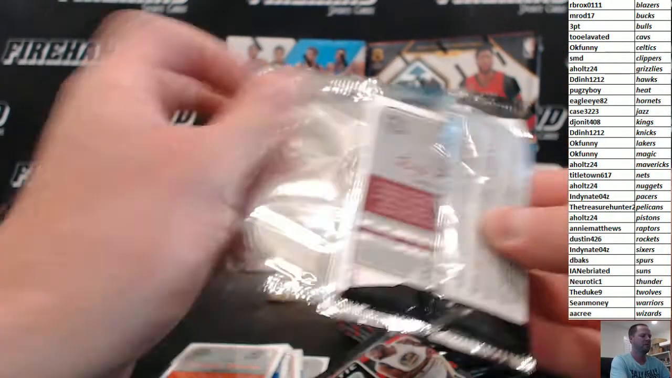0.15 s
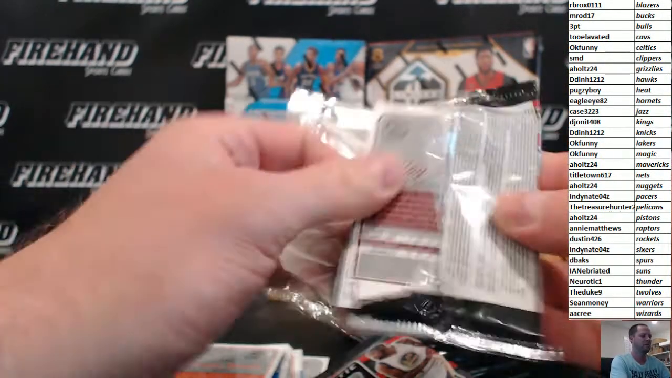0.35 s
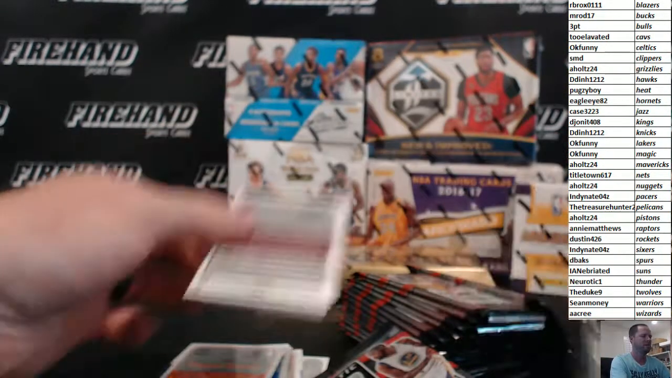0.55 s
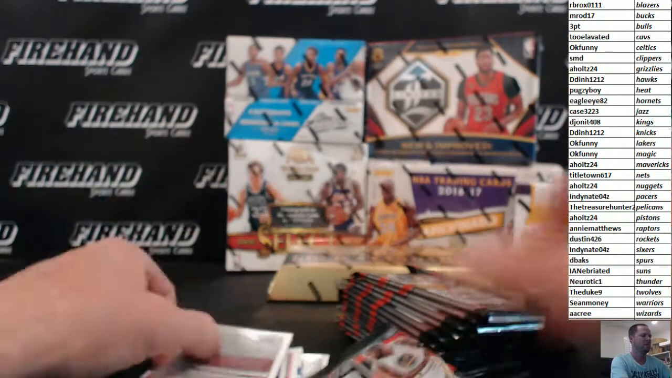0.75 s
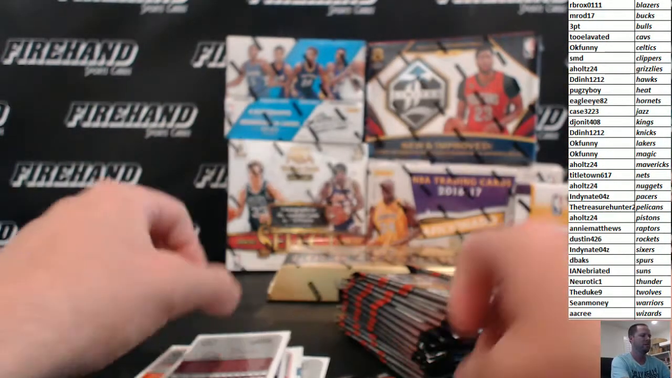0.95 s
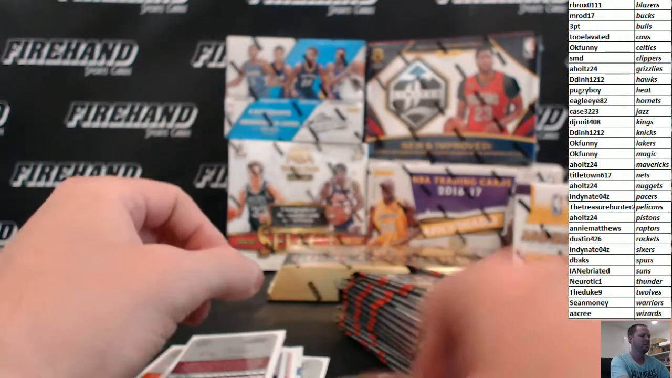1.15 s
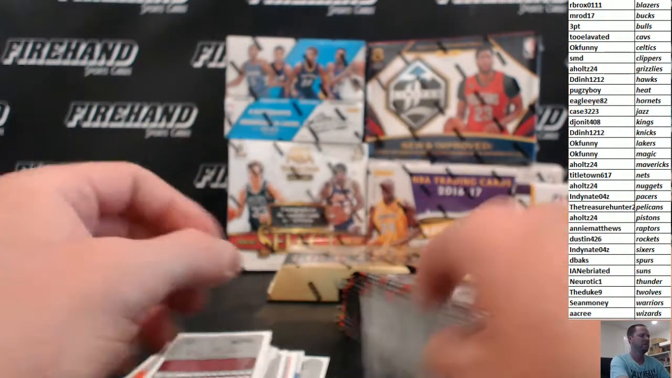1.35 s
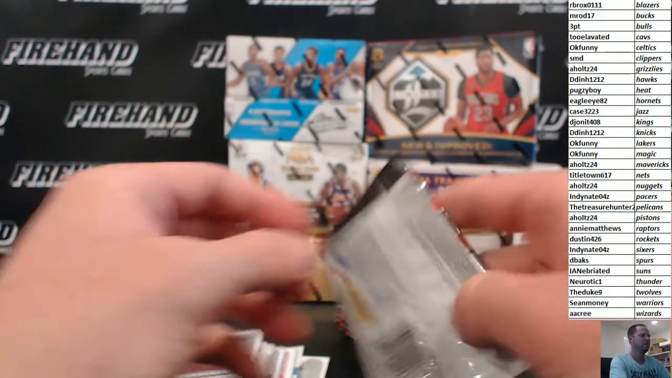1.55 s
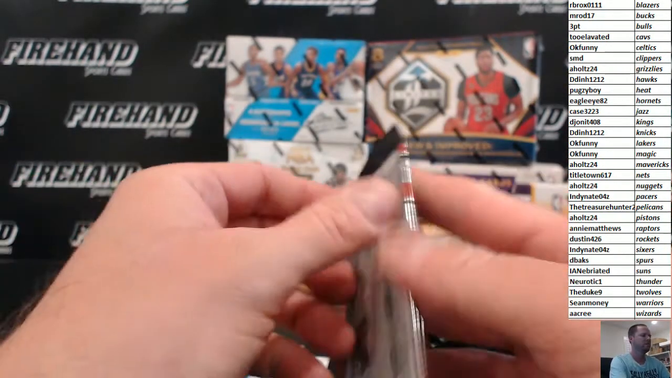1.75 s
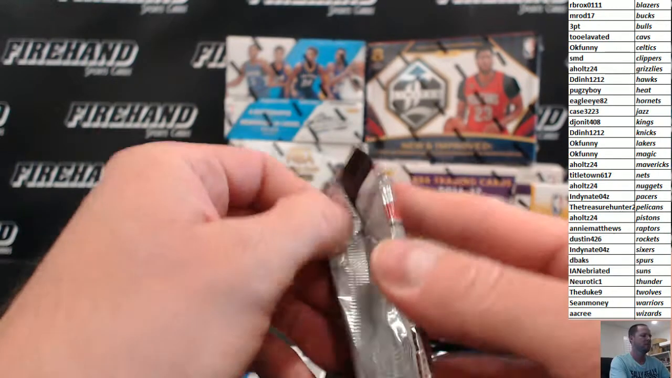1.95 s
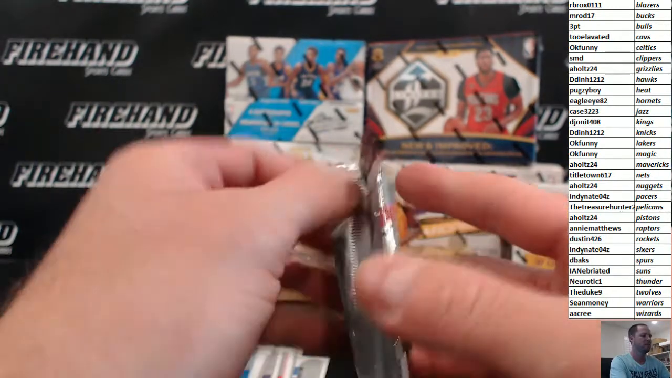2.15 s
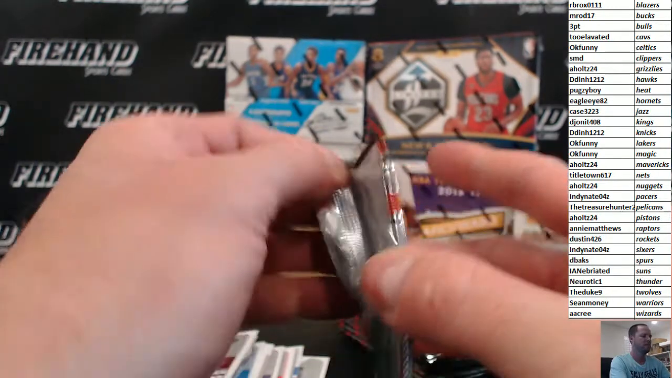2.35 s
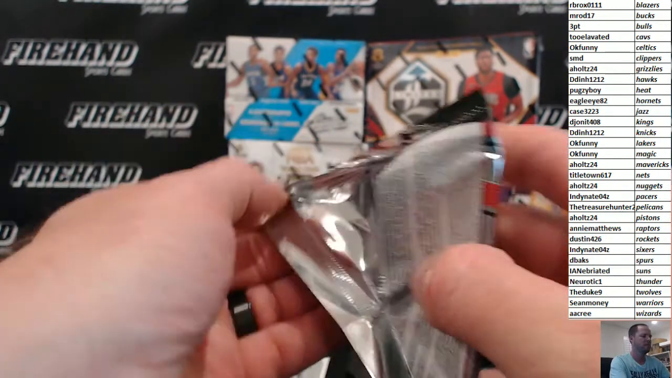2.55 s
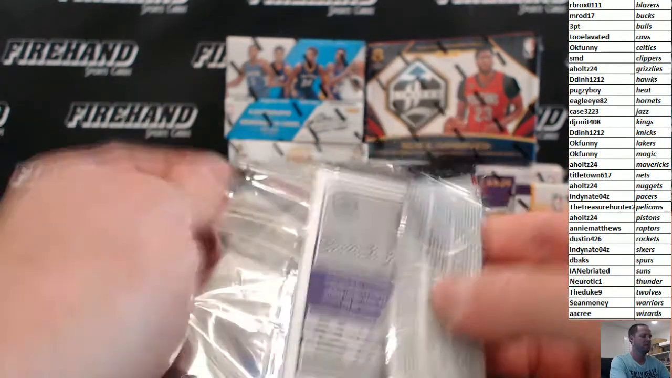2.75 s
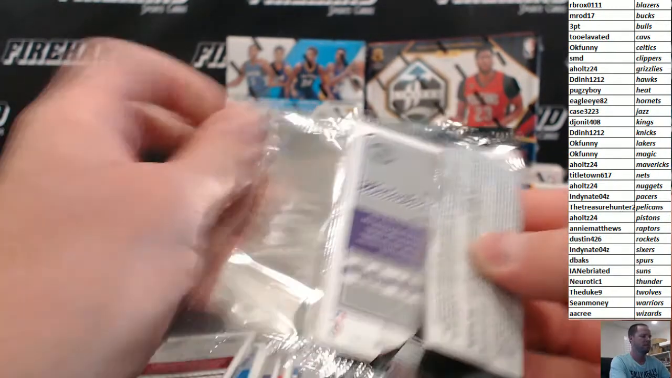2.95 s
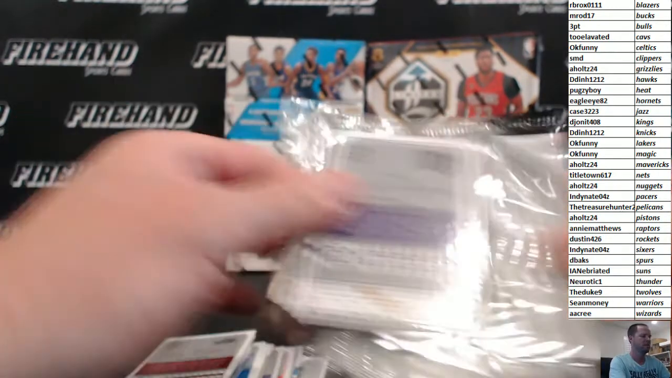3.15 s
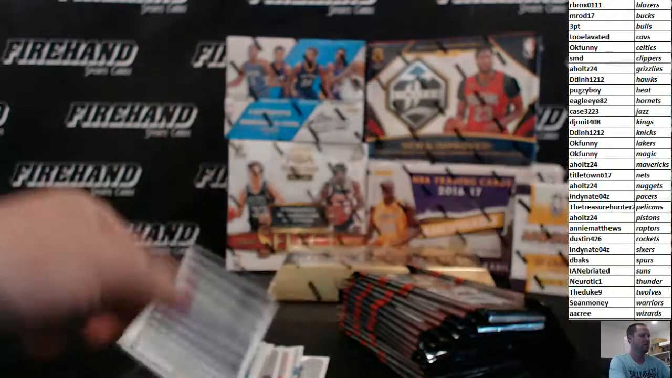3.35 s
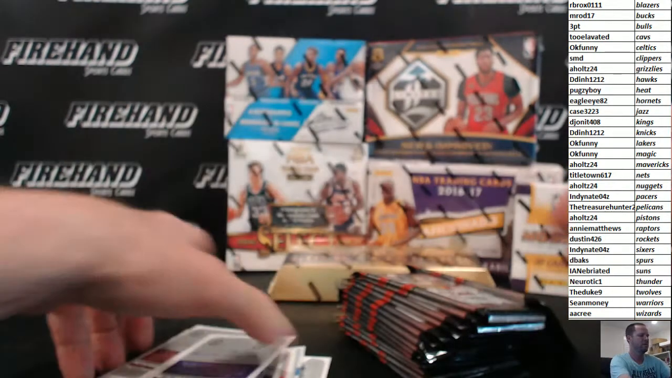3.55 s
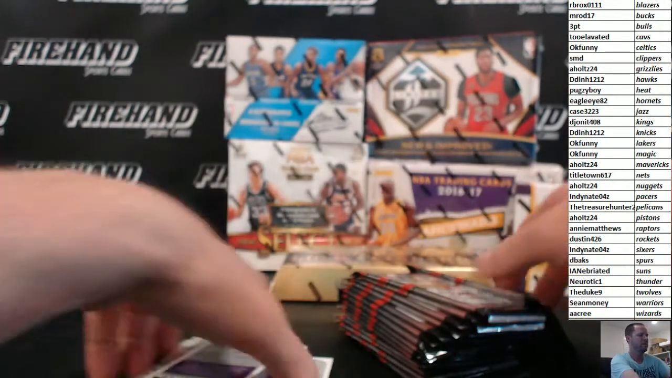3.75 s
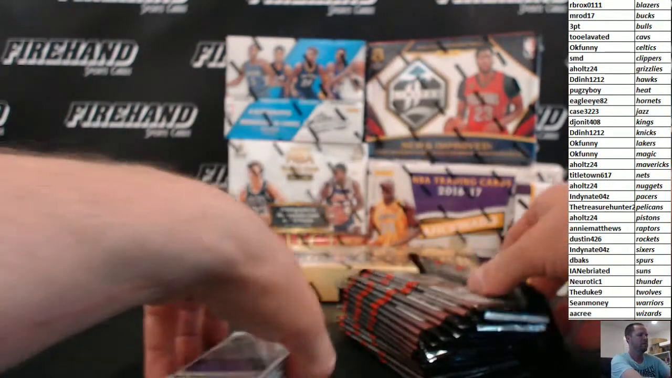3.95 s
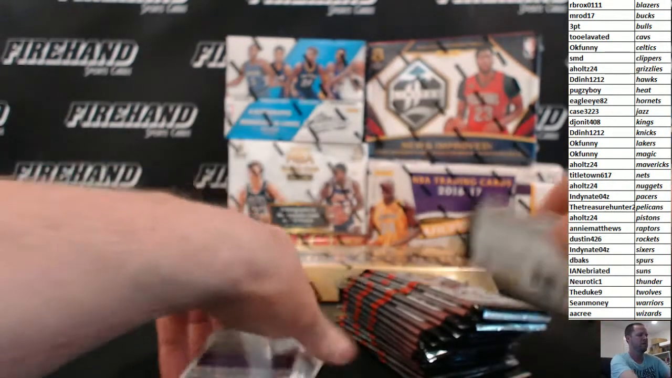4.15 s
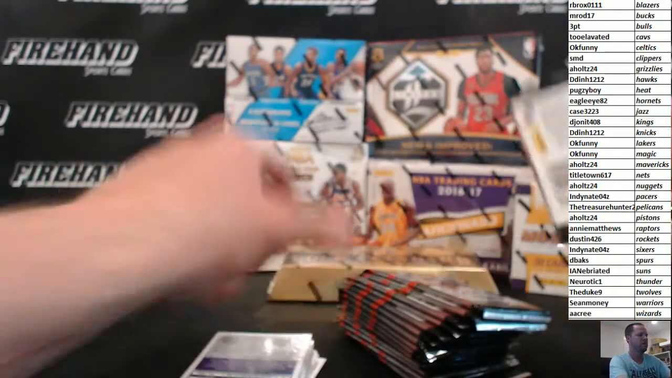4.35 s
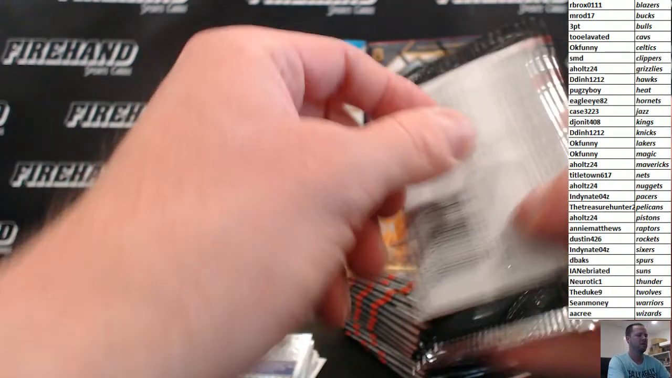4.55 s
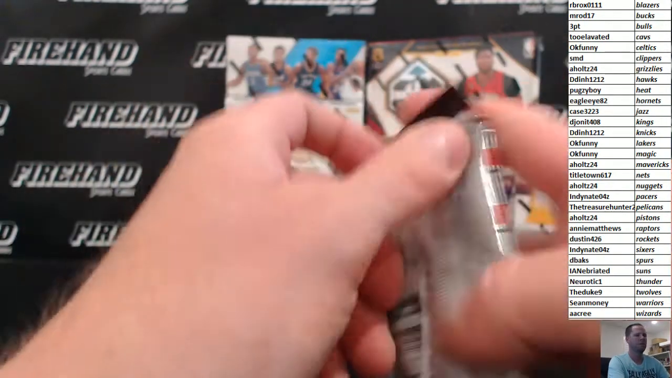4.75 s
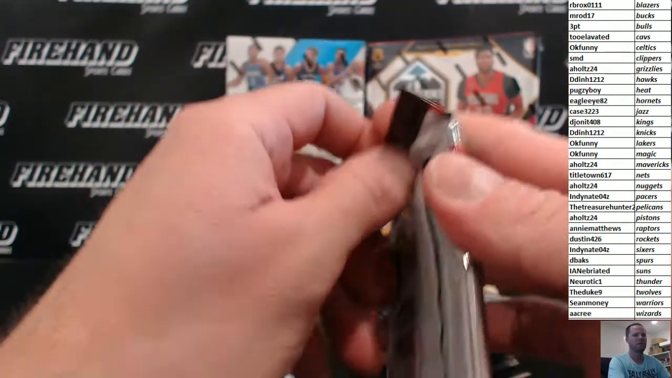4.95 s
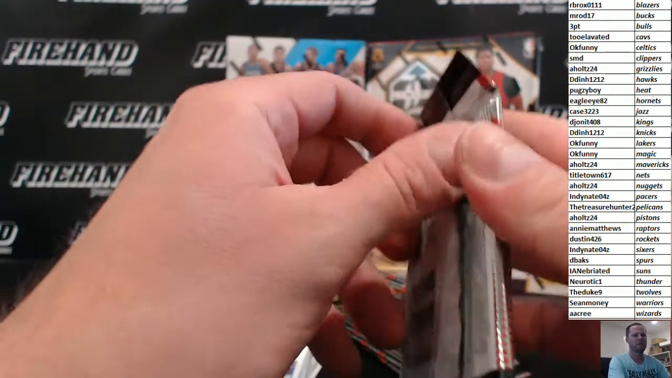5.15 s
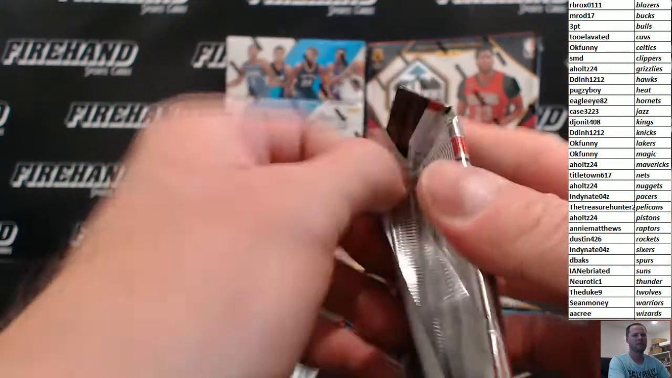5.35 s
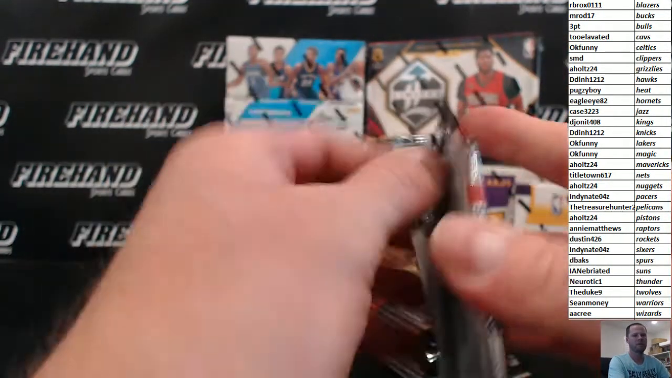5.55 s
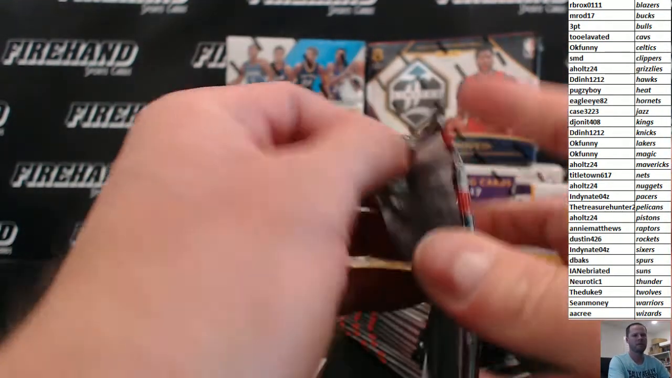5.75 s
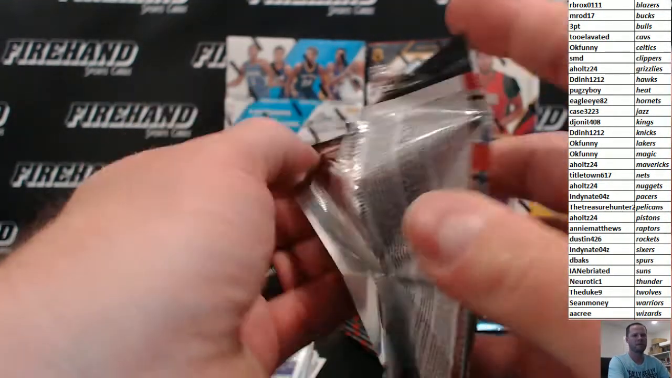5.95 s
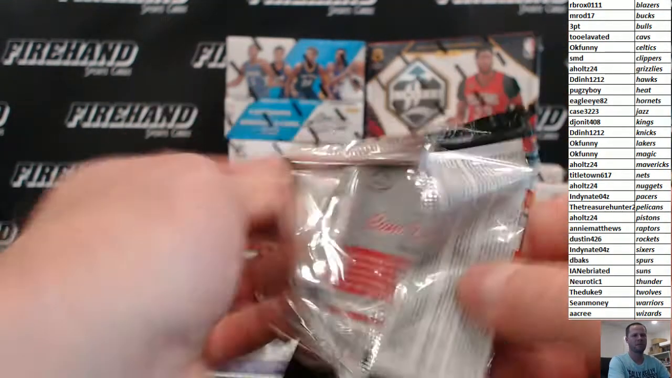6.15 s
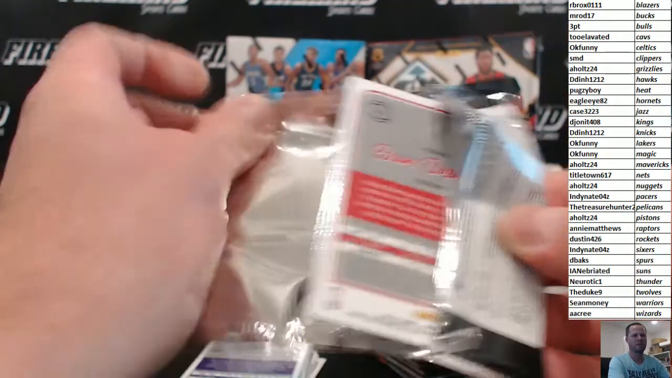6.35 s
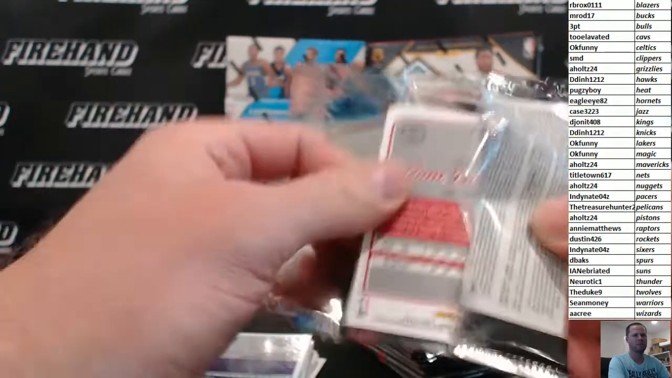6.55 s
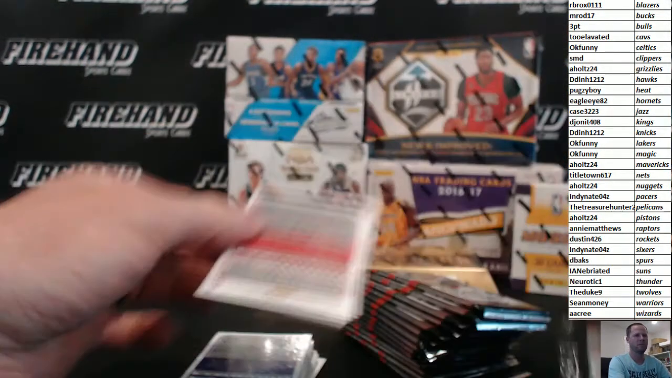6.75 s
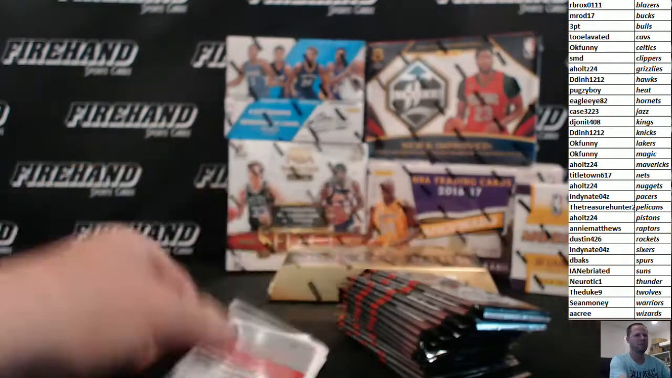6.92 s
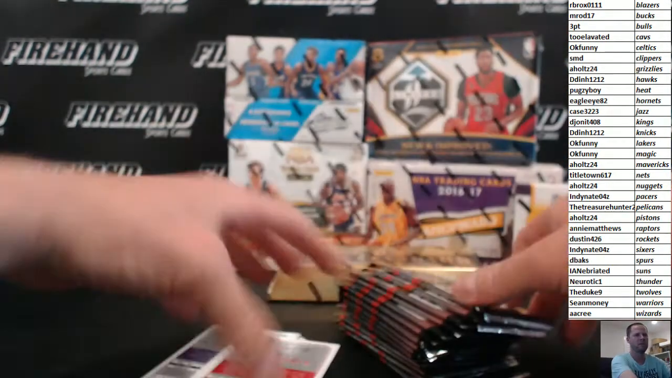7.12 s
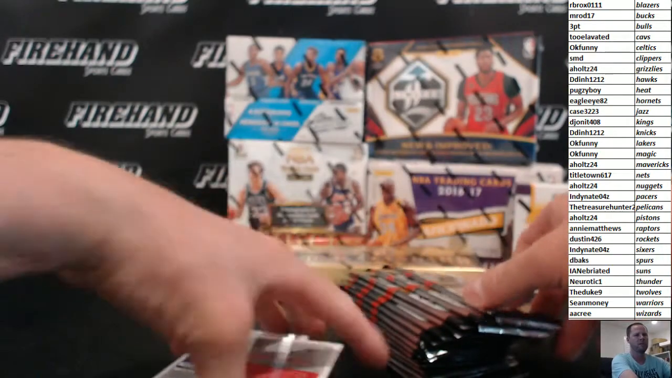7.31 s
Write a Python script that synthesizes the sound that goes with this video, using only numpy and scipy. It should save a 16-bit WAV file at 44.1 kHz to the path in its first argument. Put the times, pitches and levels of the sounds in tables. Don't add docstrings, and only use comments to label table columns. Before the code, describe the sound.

Close to a stereo pair of microphones in a small room, hands tear open crisp foil packets. A loud rip comes first, then soft card taps on the table and a near-quiet gap. A second packet crackles and rips hard, cards land again, and after faint fidgeting a third crackles thickly and tears. Low hum and room air continue underneath, with the top treble missing.

```python
import sys
import numpy as np
from scipy import signal
from scipy.fft import rfft, irfft, next_fast_len
from scipy.io import wavfile
from scipy.ndimage import uniform_filter1d

SR = 44100
rng = np.random.default_rng(int(sys.argv[2]) if len(sys.argv) > 2 else 0)


def elevation(decibels):
    levels = np.asarray(decibels, float)
    return 10 ** (levels / 20)


def file_out(sig):
    cols = np.atleast_2d(sig).T
    lim = np.clip(cols, -1, 1)
    pcm = np.round(lim * 32767).astype(np.int16)
    wavfile.write(sys.argv[1], SR, pcm)


N = 329868


def rms_one(x):
    return x / np.sqrt(np.mean(x ** 2) + 1e-20)


def at_hz(points, hz):
    point_hz, value = np.transpose(points)
    return np.interp(np.log(hz + 1), np.log(point_hz + 1), value)


def drift(rate):
    r = np.exp(-80 * np.pi * rate / SR)
    slow = signal.lfilter([1], [1, -2 * r, r * r], rng.standard_normal(N // 40 + 2002))
    slow = rms_one(slow[2000:])
    return np.interp(np.arange(N) / 40, np.arange(len(slow)), slow)


def ring(clicks, hz, t60):
    r, w = elevation(-60 / (t60 * SR)), 2 * np.pi * hz / SR
    return signal.lfilter([0, np.sin(w)], [1, -2 * r * np.cos(w), r * r], clicks + 1e-18)


def dying(power, t60):
    r = elevation(-120 / (t60 * SR))
    return np.sqrt(np.abs(signal.lfilter([1 - r], [1, -r], power + 1e-30)))


def band(x, low_hz, high_hz):
    return signal.sosfilt(signal.butter(3, [low_hz, high_hz], "band", fs=SR, output="sos"), x)


def pair(spectrum, likeness):
    hz = np.fft.rfftfreq(N, 1 / SR)
    mid, side = rfft(rng.standard_normal((2, N)))
    alike = np.clip(at_hz(likeness, hz), 0, .999)
    sides = np.sqrt(1 + alike) * mid + np.sqrt(1 - alike) * side * [[1], [-1]]
    return rms_one(irfft(sides * elevation(at_hz(spectrum, hz)), N))


def lean(x, points):
    size = next_fast_len(N)
    left_minus_right_db = at_hz(points, np.fft.rfftfreq(size, 1 / SR))
    return irfft(rfft(x, size) * elevation(left_minus_right_db / 2 * [[1], [-1]]), size)[:, :N]


def room(x, echoes, t60, wet_db):
    t = np.arange(echoes.shape[-1]) / SR
    size = next_fast_len(N + len(t))
    tails = echoes * elevation(-60 * t / t60) * np.minimum(t / 0.0016, 1)
    tails = elevation(wet_db) * tails / np.sqrt(np.sum(tails ** 2) / tails[..., 0].size)
    place = (np.arange(N) // int(.07 * SR)) % len(tails)
    wet = sum(rfft(x * (place == k), size) * rfft(tail, size) for k, tail in enumerate(tails))
    return x + irfft(wet, size)[:, :N]


# pitch in Hz, level in dB.
AIR_COLOUR = [(40, -13), (76, -24), (95, -5), (124, -3.5), (170, -7), (555, -10.5), (643, -8.5), (727, -13),
              (1720, -15), (2680, -25), (6820, -30), (7800, -35), (8940, -64)]
# pitch in Hz, likeness from 0 to 1.
AIR_ALIKE = [(60, 0.75), (300, 1), (1500, 0.2), (6000, 0.46)]
# pitch in Hz, left minus right in dB.
AIR_BALANCE = [(60, 15), (210, 4.8), (710, 5.3), (2460, 1.5), (8490, 0.5)]
# pitch in Hz, level in dB rms.
MAINS = [(120, -69), (240, -82.5)]


def background():
    t = np.arange(N) / SR
    hum = sum(elevation(db + 2.0) * np.sin(2 * np.pi * hz * t) for hz, db in MAINS)
    hum = hum * elevation(1.0 * drift(2.9))
    air = elevation(-69.5 + 1.5 * drift(14.0)) * pair(AIR_COLOUR, AIR_ALIKE)
    return lean(air + hum, AIR_BALANCE)


# start in seconds, peak in dB, contact time in seconds.
LANDINGS = [(0.823, -27, 0.0015), (0.842, -32, 0.0009), (0.865, -39.5, 0.003), (0.877, -44.5, 0.0017),
            (1.442, -39, 0.00061), (2.506, -32.5, 0.0014), (2.785, -30, 0.0007), (3.24, -36, 0.0018),
            (3.259, -43, 0.0014), (3.407, -42, 0.0017), (3.473, -27, 0.00082), (3.481, -32, 0.00053),
            (3.5, -34.5, 0.0018), (6.239, -21, 0.00094), (6.922, -33.5, 0.002), (6.94, -32, 0.0019),
            (6.972, -53, 0.0022), (7.024, -39, 0.0027)]
# pitch in Hz, level in dB, t60 in seconds.
TABLE_MODES = [(113, 1.5, 0.11), (129, 2, 0.08), (179, 0, 0.14), (275, 0, 0.043), (470, -1.5, 0.014),
               (597, -14, 0.054), (1010, -10, .04), (1400, -32.5, 0.035)]


def thuds(echoes):
    push = np.zeros(N)
    for s, db, contact in LANDINGS:
        shape = np.hanning(max(int(contact * SR), 3))
        i = round(s * SR)
        push[i:i + len(shape)] += elevation(db - 3.5) * shape / shape.sum()
    top = sum(elevation(db) * ring(push, hz, t60) * (-1) ** k for k, (hz, db, t60) in enumerate(TABLE_MODES))
    return room(top, echoes, t60=0.085, wet_db=-11.0)


# start in seconds, length in seconds,
# fine creases in dB, folds in dB relative to them, air pocket in dB relative to them.
FOIL_LET_GO = [(0.352, 0.15, -41.5, -10.5, -2.5), (1.728, 0.2, -58, -4.5, -3),
               (2.03, .13, -33.5, -5.5, -34), (3.245, 0.033, -50.5, 4, 3), (3.942, 0.094, -58.5, -25, -2),
               (4.072, 0.11, -46.5, -6.5, -12), (1.86, 0.06, -54.5, -31, -23), (4.52, 0.11, -56, -10.5, -4),
               (4.896, 0.2302, -48, -16.5, -20), (5.494, 0.092, -38.5, -11.5, -37.5),
               (6.567, 0.2, -57.5, -20.5, -20)]
SEAM_TEARS = [
    (0.054, 0.16, -22, 0, -1.5),
    (2.5005, 0.18, -17.5, 0, -7.5),
    (2.777, .18, -21.5, -2, -2),
    (5.95, 0.15, -29, -3.5, -9.5),
    (6.241, 0.15, -23, 3, -2.35),
]
FOIL_PULLS = [
    (1.905, 0.04, -45.5, -8.5, -20),
    (2.262, 0.065, -35.5, 2.5, -4.5),
    (2.735, 0.037, -23.5, 2, -5),
    (3.88, 0.06, -65, -14, -5),
    (5.096, 0.058, -57, -19, -6),
    (6.13, 0.023, -25, 4.5, -3.5),
]
FOIL_RUBS = [(0.0, 0.021, -29, 0.5, -3), (0.026, 0.02, -20, -5, -3), (0.26, 0.24, -69.5, -3, 3),
             (3.29, 0.11, -73, 5.5, 5.5), (2.62, 0.07, -37.5, -1, -23), (2.693, 0.045, -28.5, 1.5, -11),
             (4.85, 0.03, -56.5, -25.5, -28.5), (0.52, 0.41, -69.5, 1, 1.5), (1.255, 0.17, -70, -2.5, -1),
             (1.378, 0.076, -50.5, 4.5, -2), (1.968, 0.057, -47.5, -4, -24), (1.998, 0.02, -33, 0.5, -1.4),
             (2.349, 0.11, -33.5, -1.5, -8), (3.0, 0.15, -70, -0.5, 2), (3.175, 0.061, -46.5, -17, -1.5),
             (4.645, 0.17, -58.5, -4, -6), (4.882, 0.025, -47.5, -14.5, -28),
             (5.18, .16, -47.5, -11.5, -35), (5.376, 0.098, -39.5, -4, -17), (5.55, 0.4, -47.5, -9, -11.5),
             (5.71, 0.31, -36.5, 0.5, -17), (5.874, 0.068, -20, -1.5, -4.5),
             (6.169, 0.061, -25, -2.5, -3.5), (6.43, 0.18, -65, 0, 1), (6.747, 0.11, -66, -1, 0.5)]
CARD_BRUSHES = [
    (0.815, 0.093, -60.5, -4.5, 2),
    (3.4, 0.27, -67, 2.5, 6),
    (6.655, 0.1, -59.5, 5, 7.5),
    (6.91, .13, -69, 14, 6),
    (7.014, 0.1, -72, 8.5, 10.5),
]
PACK_SLIDE = [
    (1.52, 0.19, -47, -9.5, -16.5),
]
# gestures, share of length before the peak, rise in dB, fall in dB,
# release in dB per second, whole wrapper offset in dB.
GESTURE_KINDS = [
    (FOIL_LET_GO, 0.018, 5, 31.6, 100, -1), (SEAM_TEARS, 0.06, 0.61, 26.96, 780, 3.4),
    (FOIL_PULLS, 0.9, 13, .3, 210, -14), (FOIL_RUBS, 0.059, 6.7, 0.73, 340, -4.5),
    (CARD_BRUSHES, .35, 1.3, 47, 250, 0.53), (PACK_SLIDE, 0.2, 11, 5.1, 400, 38)]


def handling(lead_in_db=93, wrapper_follows=2.3, tight_hz=5380, folds_db_per_octave=41):
    t = np.arange(N) / SR
    power, pitch = np.zeros((4, N)) + elevation(-280), np.zeros(N)
    for rows, share, rise_db, fall_db, release, wrapper_db in GESTURE_KINDS:
        for s, length, db, folds_db, pocket_db in rows:
            span = slice(max(int((s - .03) * SR), 0), int((s + length + .25) * SR))
            peak_s = np.clip(share, .005, .995) * length
            knots = s + np.array([-.03, 0, peak_s, length, length + 1])
            shape_db = [-rise_db - lead_in_db, -rise_db, 0, -fall_db, -fall_db - release]
            level = db + np.interp(t[span], knots, shape_db)
            sizes = np.array([0, folds_db, pocket_db, wrapper_follows * pocket_db + wrapper_db])
            power[:, span] += elevation(2 * (level + sizes[:, None]))
            pitch[span] -= elevation(2 * level) * folds_db / folds_db_per_octave
    db = 10 * np.log10(power)
    return db[0], *(db[1:] - db[0]), tight_hz * 2 ** (pitch / power[0])


# lowest pitch in Hz, highest pitch in Hz.
CREASE_ZONES = [(2700, 8600), (1400, 2700), (650, 1400), (200, 650)]
RING_CYCLES = [4.6, 20, 11, 40]
# pitch in Hz, level in dB per Hz.
FOIL_COLOUR = [(200, -9.5), (280, -9), (430, -3), (650, -15.5), (780, -7.5), (980, 2), (1300, -2),
               (1450, -17), (1720, 2.5), (1950, -9), (2250, 0), (2700, -13.5)]
# pitch in Hz, level in dB.
FINE_COLOUR = [(2700, 0), (3300, -5), (4600, 2.5), (5600, -2), (7300, 1), (8200, -8.5)]


def creases(clicks, zone, tight_hz, hump_octaves=0.7, skirt_db=-17.5, patchy_db=2.0):
    at = np.flatnonzero(clicks)
    low, high = CREASE_ZONES[zone]
    pitches, dealt = np.geomspace(low, high, num=12), rng.integers(0, 12, N)
    colour = elevation(at_hz(FOIL_COLOUR, pitches))[:, None] * np.ones(len(at))
    if zone == 0:
        octaves_off = np.log2(pitches[:, None] / tight_hz[at])
        colour = np.exp(-(octaves_off / hump_octaves) ** 2) + elevation(skirt_db)
        colour = colour * elevation(at_hz(FINE_COLOUR, pitches))[:, None]
    patches = rng.standard_normal((12, N // 3000 + 1))
    colour = colour * elevation(patchy_db * patches[:, at // 3000])
    colour = colour / np.sqrt(np.mean(colour ** 2, axis=0))
    clicks = clicks.copy()
    clicks[at] *= colour[dealt[at], np.arange(len(at))]
    rings = 0
    for k, hz in enumerate(pitches):
        rings = rings + ring(clicks * (dealt == k), hz, RING_CYCLES[zone] / hz) * np.sqrt(hz / low)
    return band(rings, low * 0.95, high * 1.0)


# start in seconds, length in seconds,
# level in dB rms, pitch in Hz.
CAVITIES = [(0.035, 0.11, -26.5, 1140), (0.34, .14, -50.5, 2430), (6.683, 0.039, -52, 2900),
            (3.236, 0.046, -48, 1640), (3.421, 0.045, -50.5, 2060), (2.164, 0.074, -57, 1830),
            (6.691, 0.014, -44, 7200), (2.044, 0.095, -43, 4470), (0.81, 0.048, -48, 1040),
            (1.385, 0.11, -53, 590), (1.548, 0.19, -47, 2210), (1.61, 0.11, -42, 366),
            (1.851, 0.092, -54.5, 1810), (6.637, 0.089, -56, 7700), (2.397, 0.085, -36.5, 1760),
            (2.772, 0.071, -24, 280), (2.746, 0.085, -24.5, 840), (2.9, 0.045, -49.5, 1730),
            (2.502, 0.11, -27, 4500), (1.53, 0.23, -52.5, 5400), (4.52, 0.067, -62, 1120),
            (4.551, 0.044, -56.5, 284), (4.65, 0.091, -51.5, 1100), (4.785, 0.17, -60, 1890),
            (5.184, 0.17, -50, 1730), (5.367, 0.017, -48.5, 330), (5.559, 0.046, -49.5, 413),
            (5.5, 0.51, -50, 1740), (5.69, 0.65, -38, 1710), (5.882, 0.036, -21.5, 1691),
            (6.661, 0.12, -50, 252), (6.757, 0.029, -51, 710), (6.928, 0.072, -54, 1370),
            (7.02, 0.033, -52.5, 890), (4.767, 0.023, -54, 250)]


def hollows(per_s=3500, spread=1.04, q=10, peak_share=0.16, rise_db=13, fall_db=15):
    out = np.zeros(N)
    for s, length, db, hz in CAVITIES:
        u = np.arange(int(.3 * SR)) / SR / length
        draw = rng.random((2, len(u)))
        clicks = (draw[0] < per_s / SR) * (draw[1] - .5) + 1e-9
        t60 = q / hz * (hz / 1500) ** 0.27
        apart = spread ** np.sqrt(hz / 1500)
        rung = ring(ring(clicks, hz / apart, t60), hz * apart, t60)
        level = np.interp(u, [0, peak_share, 1, 2.2], [-rise_db, 0, -fall_db, -8 * fall_db])
        start = round(s * SR)
        out[start:][:len(u)] += (elevation(db + level) * rms_one(rung))[:N - start]
    return out


def crackle(per_s=2400, spread_db=4.0, clump_db=4.0, evening=0.85):
    fine_db, folds_db, pocket_db, wrapper_db, tight_hz = handling()
    sizes = elevation(spread_db * np.minimum(rng.exponential(1, N), 5)) * rng.choice([-1, 1], N)
    out = 0
    for zone, rel_db in enumerate([0, folds_db, pocket_db, wrapper_db]):
        born = rng.random(N) < per_s * elevation(clump_db * drift(30.0)) / SR
        grains = rms_one(creases(born * sizes, zone, tight_hz))
        slow_power = uniform_filter1d(grains ** 2, size=SR // 25) + .01
        even = rms_one(grains * slow_power ** (-evening / 2))
        out = out + even * elevation(fine_db + rel_db - 7.0)
    return out


# start in seconds, peak in dB, pitch
# in Hz.
SMALL_POPS = [(0.0585, -14.5, 6535), (0.0677, -15, 6600), (0.1706, -27, 5910), (0.2004, -25, 6470),
              (0.3535, -34, 5970), (0.359, -18, 7620), (0.37, -23, 6570), (0.6866, -48, 4570),
              (0.8458, -31.5, 6100), (1.38, -38, 3330), (1.7061, -37, 4660), (1.9704, -36.5, 2820),
              (2.0011, -27.5, 6360), (2.0272, -18.5, 6130), (2.1716, -38.5, 6030), (2.258, -25.5, 6264),
              (2.2729, -24.5, 6670), (2.3309, -29, 4840), (2.4993, -15.5, 5450), (2.7638, -19.5, 5930),
              (2.7841, -13.5, 5673), (3.0558, -47.5, 6120), (3.1824, -27.5, 7180), (3.2376, -31, 4870),
              (4.0721, -30.5, 6636), (4.0758, -31, 3870), (4.3709, -56, 3770), (4.5207, -43.5, 7400),
              (4.6652, -37.5, 5040), (4.6708, -43, 4900), (4.77, -43.5, 5820), (4.8515, -49, 5430),
              (4.8835, -39, 5560), (4.8929, -43, 5000), (4.8989, -35.5, 6270), (4.9307, -33, 4600),
              (5.0427, -38, 5400), (5.0635, -37, 6750), (5.1182, -37, 6780), (5.1831, -31.5, 5430),
              (5.2076, -32, 3930), (5.2486, -32.5, 3905), (5.378, -27, 7280), (5.411, -34, 6290),
              (5.4667, -25, 5155), (5.4813, -17, 6600), (5.5886, -27.5, 5950), (5.6003, -26, 6400),
              (5.6479, -33, 5790), (5.7126, -25, 5140), (5.7843, -25.5, 4952), (5.8031, -21.5, 4100),
              (5.8169, -23, 5200), (5.8751, -15.5, 3890), (5.8789, -15.5, 6820), (6.1049, -34, 5070),
              (6.2343, -17, 5280), (6.5678, -27.5, 7530), (7.0109, -51.5, 6990),
              (0.549, -53, 7000), (0.745, -52, 7000), (0.803, -54, 4700), (1.783, -50, 7000),
               (1.861, -46, 6980), (4.48, -60, 2450), (6.44, -51.5, 4800), (6.501, -54, 7600),
               (6.751, -44, 7000), (6.912, -56.5, 2900)]
# start in seconds, peak in dB, pitch in Hz.
MIDDLING_POPS = [(0.028, -13, 1770), (0.3584, -21.5, 2480), (1.3796, -32, 1980), (1.3923, -33, 2030),
                 (1.8626, -37.5, 1650), (1.971, -43, 2560), (2.1618, -47, 1610), (2.1724, -41.5, 1780),
                 (2.2731, -20.5, 1680), (2.331, -25, 1710), (2.3407, -17.5, 1640), (2.3933, -21.5, 1680),
                 (2.4571, -28.5, 1840), (2.518, -13.5, 2460), (2.682, -26.5, 2370), (2.7094, -16.5, 2350),
                 (2.7913, -19, 1889), (4.8938, -36.5, 2410), (5.1836, -32.5, 1590), (5.3765, -33.5, 2426),
                 (5.4275, -32, 2370), (5.4557, -28, 2390), (5.5968, -29.5, 1710), (5.6486, -28, 1900),
                 (5.7119, -20, 1600), (5.7848, -15.5, 1760), (5.8168, -16.5, 1930), (5.8767, -7.5, 1640),
                 (5.9457, -8.5, 2010), (6.1562, -15, 1619), (6.2015, -11.5, 2330), (6.2107, -18.5, 1550),
                 (6.2358, -8.5, 2330), (6.5672, -40, 2060), (6.6788, -41, 1307), (6.9429, -36, 1400),
                 (7.0218, -43, 1540)]
# start in
# seconds, peak in dB, pitch in Hz.
LARGE_POPS = [(0.0506, -13, 575), (0.0784, -12, 1040), (0.2032, -29, 940), (1.387, -33.5, 642),
              (1.6293, -33, 444), (2.0003, -25.5, 770), (2.0261, -26, 1130), (2.2733, -21.5, 1030),
              (2.3703, -20, 1230), (2.4113, -27.5, 750), (2.5009, -18, 650), (2.7852, -10, 804),
              (3.4197, -30, 940), (3.4715, -31.5, 470), (4.0768, -44, 880), (4.5204, -43, 1043),
              (4.664, -34.5, 1082), (4.7003, -42.5, 823), (4.729, -44, 980), (4.7759, -39, 1060),
              (5.3898, -33, 970), (5.5956, -34, 1280), (5.6817, -37.5, 990), (5.7122, -20, 1240),
              (5.7789, -25.5, 1290), (5.8016, -24, 1050), (5.8146, -15.5, 776), (5.8596, -26.5, 890),
              (5.8765, -4, 1070), (5.9167, -25, 1210), (5.9345, -13.5, 840), (6.1444, -20, 960),
              (6.2068, -15.5, 925), (6.2476, -14, 417), (6.2954, -21.5, 980), (6.6966, -25.5, 748),
              (6.9419, -41, 448), (7.0184, -35, 500),
              (0.8356, -37.5, 1220), (0.8458, -33.5, 3050), (0.846, -34.5, 1060), (1.451, -36.5, 685),
             (3.4316, -43, 1080), (3.441, -42, 1195), (3.47, -37.5, 950), (3.482, -36.5, 900)]
# pops of one size, offset in dB, cycles to the peak, level of the stray partial in dB.
POP_SIZES = [(SMALL_POPS, 0.39, 1.6, -3.5), (MIDDLING_POPS, -1.5, 1.2, -8),
             (LARGE_POPS, -1.1, 0.78, -14)]


def pops():
    out, t = np.zeros(N + 1024), np.arange(1024) / SR
    for rows, offset_db, cycles, partial_db in POP_SIZES:
        for (s, db, hz), (turn, other, ratio) in zip(rows, rng.random((len(rows), 3))):
            u = t * hz / cycles
            tone = np.sin(2 * np.pi * (hz * t + turn))
            partial = np.sin(2 * np.pi * (hz * (.55 + 1.1 * ratio) * t + other))
            tone = tone + elevation(partial_db) * partial
            out[round(s * SR):][:1024] += elevation(db + offset_db) * u * np.exp(1 - u) * tone
    return out[:N]


def snaps(per_s=260, spread_db=4.5, level_db=-9.0, follows=0.93):
    fine_db, folds_db = handling()[:2]
    sizes = elevation(spread_db * np.minimum(rng.exponential(1, N), 3)) * rng.choice([-1, 1], N)
    cracks = sizes * (rng.random(N) < per_s / SR) + 1e-18
    fine = rms_one(band(cracks, 2700.0, 7900.0))
    folds = rms_one(band(cracks, 900.0, 2700.0))
    return elevation(follows * (fine_db + 33) - 34.5 + level_db) * (fine + elevation(folds_db - 1.5) * folds)


# start in seconds, peak in dB, air pocket in dB relative.
BRIGHT_BUCKLES = [(0.2013, -28, -3.5), (0.794, -54, -26), (1.9707, -32.5, -34), (2.161, -35.5, -3.5),
                  (2.2546, -26.5, -6), (4.0782, -29.5, -5.5), (4.664, -37, -0.5), (4.729, -40.5, 2.5),
                  (4.8926, -32.5, -11.5), (4.9302, -34.5, -50), (5.028, -43, -21), (5.062, -36, -31),
                  (5.1487, -40, -10), (5.2457, -23, -16), (5.304, -35.5, -27), (5.3776, -24.5, -6),
                  (5.446, -24, -20.5), (5.4800, -28.5, -36), (5.6814, -26, -20), (6.103, -31, -37.5),
                  (6.569, -31, -6)]
# start in seconds, peak in dB, air pocket in dB relative.
MIDDLING_BUCKLES = [(0.024, -13.5, -11), (0.3583, -11.5, -37), (0.4488, -26.5, -13.5), (0.621, -36.5, -38),
                    (1.3774, -18.5, -15), (1.432, -20, -9), (1.704, -24.5, -15), (1.9274, -23.5, -37),
                    (2.0277, -10, -35), (2.2757, -16, -14), (2.3698, -11, -11), (2.3884, -5, -11),
                    (2.4989, -18, 10), (2.6707, -15, -41), (2.713, -7, -26.5), (3.113, -38, -7),
                    (3.185, -26, -25), (3.239, -27, -26.5), (4.5197, -40.5, -9), (4.762, -27, -17.5),
                    (4.9007, -21, -34.5), (5.5838, -17, -9), (5.6472, -16.5, -38), (5.803, -13.5, -3),
                    (5.8131, -2, -13.5), (6.197, -5.5, -8.5), (6.233, 2, -6), (2.781, -1.5, -3)]
# start in seconds, peak in dB, air pocket in dB relative.
DULL_BUCKLES = [(0.5891, -34, -19), (0.687, -29.5, -31), (1.861, -40.5, -11), (2.3319, -4.5, -24),
                (2.412, -7.5, -14.5), (2.436, -15, -14.5), (2.456, -18.5, -21.5), (2.6925, -12.5, -17),
                (3.408, -40.5, 4.5), (4.871, -33.5, -36), (5.1796, -21, -35), (5.7113, -14, -18),
                (5.7815, -4, -22.5), (5.8737, 2.5, -9), (6.129, -20, -23), (6.1392, -10.5, -13.5),
                (6.679, -25, -6.5), (6.6955, -33.5, -5), (6.752, -36, -16), (6.9424, -35.5, -9.5),
                (7.019, -41.5, 8)]


def buckles(burst_s=0.012, rise_s=0.017):
    kinds = [BRIGHT_BUCKLES, MIDDLING_BUCKLES, DULL_BUCKLES]
    s, peak_db, pocket_db = np.transpose(sum(kinds, []))
    fine_db = np.repeat([2.5, -5.5, -15], [len(rows) for rows in kinds])
    shower, tight_hz, out = rng.standard_normal(N), handling()[-1], 0
    for zone, rel_db in enumerate([fine_db + 9.5, -6.0, pocket_db + 4.5, pocket_db - 18.5]):
        strikes = np.zeros(N)
        strikes[np.round(s * SR).astype(int)] = elevation(2 * (peak_db + rel_db - 9.0))
        burst = dying(dying(strikes, rise_s) ** 2, burst_s)
        out = out + creases(shower * burst * (burst > 1e-6), zone, tight_hz)
    return out


def foil(echoes):
    near = room(crackle() + hollows(), echoes, t60=0.058, wet_db=-1.0)
    sharp = room(band(pops(), 290.0, 10000.0) + snaps(), echoes[::-1], t60=.05, wet_db=-6.0)
    return near + sharp + room(buckles(), echoes, t60=0.2, wet_db=-0.5)


# pitch in Hz, level in dB.
TABLE_ECHO = [(100, -19.5), (200, -14), (350, -10.5), (600, -15), (1000, -16.5), (2000, -16.5), (4500, -30),
              (8500, -30.5)]


def glance(x, t60=0.064, shift_per_s=44.0):
    size, turn = next_fast_len(N + 4096), 2 * drift(shift_per_s)
    tails = rng.standard_normal((2, 4096)) * elevation(-60 * np.arange(4096) / SR / t60)
    colour = elevation(at_hz(TABLE_ECHO, np.fft.rfftfreq(size, 1 / SR))) / np.sqrt(np.sum(tails[0] ** 2))
    parts = rfft(x.mean(axis=0) * [np.cos(turn), np.sin(turn)], size) * rfft(tails, size)
    return x + irfft(parts.sum(axis=0) * colour, size)[:N] * [[1], [-1]]


# pitch in Hz, likeness from 0 to 1.
ECHO_ALIKE = [(60, 0.23), (160, 0.26), (430, 0.86), (1170, 1), (3150, 0.94), (8490, 0.99)]
# pitch in Hz, left minus right in dB.
FOIL_BALANCE = [(120, 0.5), (280, -7.5), (540, -6), (1020, -3.5), (2060, -2.5), (4180, 1.5), (8490, 2.5)]


def scene():
    hiss = pair([(20, 0), (20000, 0)], ECHO_ALIKE)
    echoes = hiss[:, :4 * 12000].reshape(2, 4, -1).swapaxes(0, 1)
    return lean(glance(foil(echoes) + thuds(echoes)), FOIL_BALANCE) + background()


def starve(x, under_db=-18.0):
    mid, side = signal.stft([x[0] + x[1], x[0] - x[1]], nperseg=2048)[2]
    power = (np.abs(side[:1024]) ** 2).reshape(128, 8, -1).mean(axis=1)
    faint = power < elevation(2 * under_db) * np.mean(np.abs(mid[:400]) ** 2, axis=0)
    side[:1024] *= np.repeat(faint, 8, axis=0)
    return x - signal.istft(side, nperseg=2048)[1][:N] / 2 * [[1], [-1]]


def roll_off(x):
    return signal.sosfilt(signal.butter(12, 9090, fs=SR, output="sos"), x)


def record(dry):
    cut = signal.sosfilt(signal.butter(4, 87.0, "high", fs=SR, output="sos"), starve(dry))
    rounded = 1.255 * np.tanh(cut / 1.275)
    cut = signal.sosfilt(signal.cheby2(10, 75, 8985 * 1.16, fs=SR, output="sos"), rounded)
    mix = np.clip(cut, -1, 1) + elevation(-101.0) * rng.standard_normal(dry.shape)
    return roll_off(mix)


dry = scene()
out = record(dry)
file_out(out)
```